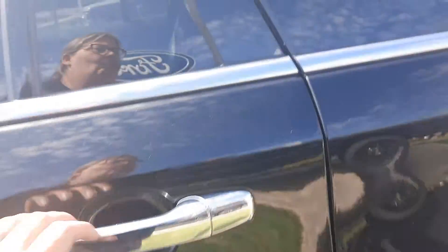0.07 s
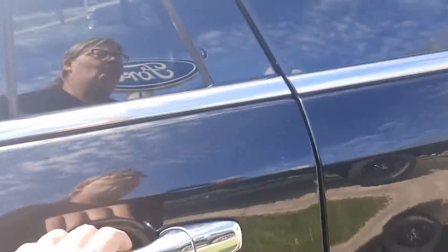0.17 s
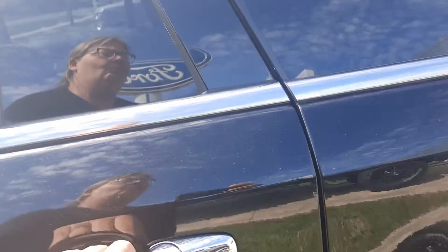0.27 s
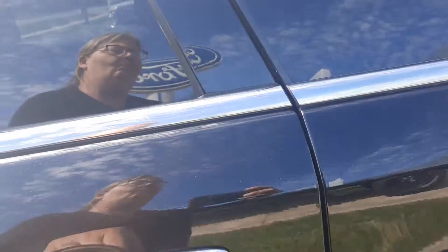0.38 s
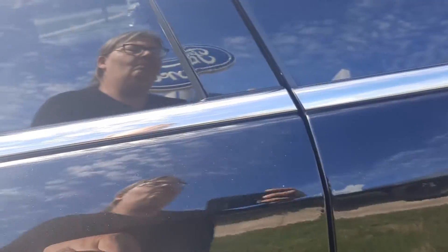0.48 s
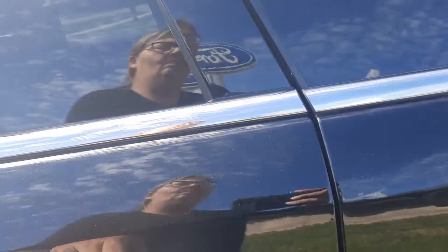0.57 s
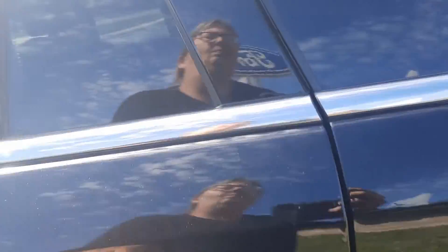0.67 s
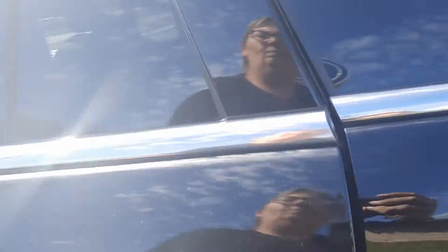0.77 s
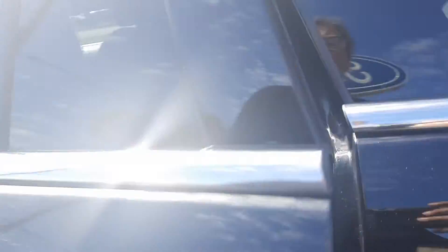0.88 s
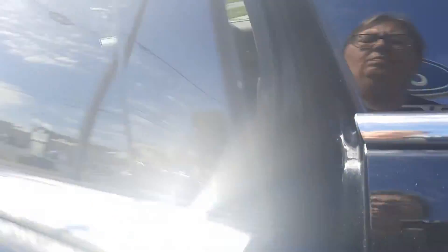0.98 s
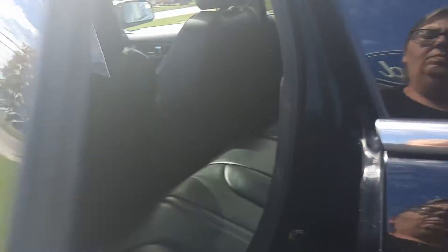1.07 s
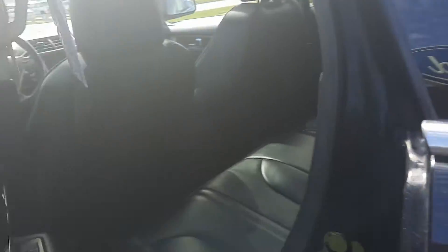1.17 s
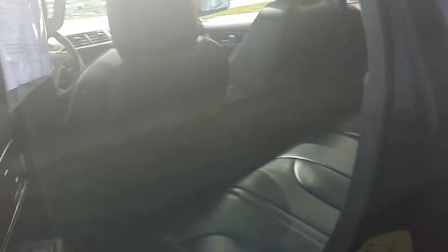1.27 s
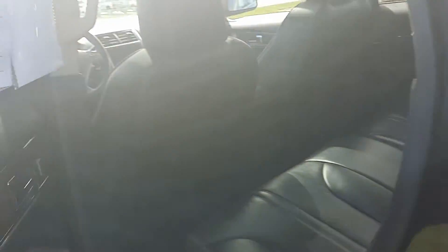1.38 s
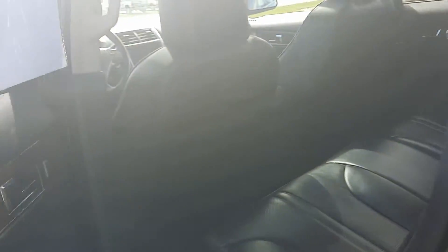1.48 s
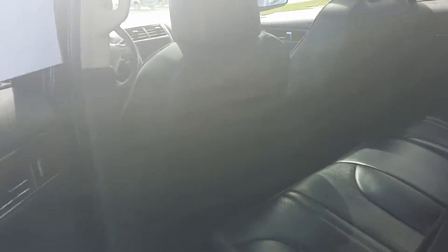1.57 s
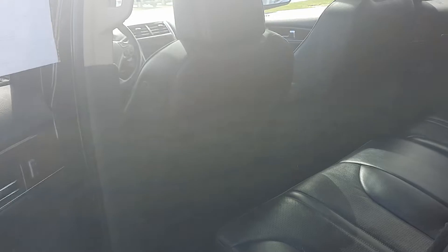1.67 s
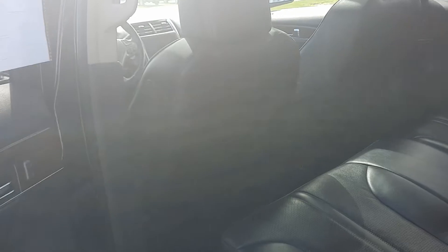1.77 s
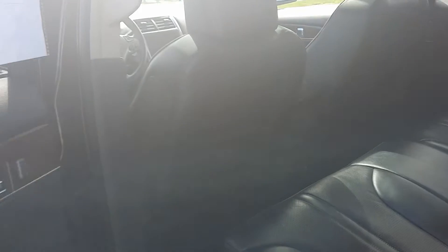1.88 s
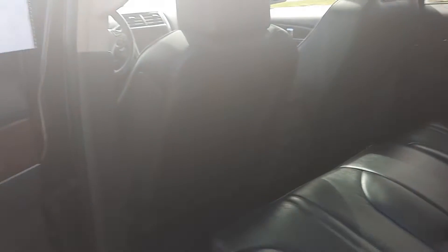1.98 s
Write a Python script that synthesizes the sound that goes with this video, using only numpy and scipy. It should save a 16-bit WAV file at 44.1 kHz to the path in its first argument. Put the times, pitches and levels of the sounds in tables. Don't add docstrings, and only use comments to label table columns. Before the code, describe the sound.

Car door opening outdoors: small handle click, hard latch clunk, wind thumps, then a knocking stop

```python
import sys
import numpy as np
from scipy import signal
from scipy.fft import irfft
from scipy.io import wavfile
from scipy.ndimage import uniform_filter1d

SR = 44100
rng = np.random.default_rng(int(sys.argv[2]) if len(sys.argv) > 2 else 0)


def generate_wav(signal):
    frames = np.transpose(np.atleast_2d(signal))
    scaled = np.clip(frames, -1, 1) * 32767
    pcm = np.round(scaled).astype(np.int16)
    wavfile.write(sys.argv[1], SR, pcm)


def volts_from_db(level):
    exponent = np.asarray(level, float) / 20
    return 10 ** exponent


N = 88200


def read(points, hz):
    f, v = np.transpose(points)
    return np.interp(np.log(hz + 1), np.log(f + 1), v)


def curve(points):
    s, db = np.transpose(points)
    return volts_from_db(np.interp(np.arange(N) / SR, s, db))


def evened(x):
    return x / np.sqrt(np.mean(x ** 2) + 1e-20)


def add(mix, s, sound):
    at = round(s * SR)
    sound = sound[:, max(-at, 0):]
    part = mix[:, max(at, 0):][:, :sound.shape[1]]
    part += sound[:, :part.shape[1]]


def sides(db):
    return volts_from_db(np.array([[db / 2], [-db / 2]]))


def band(x, lo_hz, hi_hz):
    return signal.sosfilt(signal.butter(2, [lo_hz, hi_hz], "band", fs=SR, output="sos"), x)


def late(x, count):
    return np.array([x[0], np.concatenate([x[1, count:0:-1], x[1, :N - count]])])


# frequency in Hz, level in dB.
CRACK_COLOUR = [(300, -6), (900, -2), (2000, -10), (3700, -13), (5000, -12), (7200, -12), (9800, -13),
                (13500, -5.5)]
# frequency in Hz, time to fall 60 dB in seconds.
CRACK_FADE = [(300, 0.45), (900, 0.082), (3000, 0.059), (6000, 0.017), (12000, 0.044)]


def crack():
    noise = rng.standard_normal(8192) + 0.35 * rng.standard_normal((2, 8192))
    hz, t, cells = signal.stft(noise, fs=SR, nperseg=128)
    hz = hz[:, None]
    fading_db = read(CRACK_COLOUR, hz) - 60 * t / read(CRACK_FADE, hz)
    x = band(signal.istft(cells * volts_from_db(fading_db), fs=SR, nperseg=128)[1], 260, 10000)
    fade_in = np.minimum(np.arange(x.shape[1]) / 70, 1)
    return x / np.sqrt(np.mean(x[:, :256] ** 2)) * fade_in


def struck(blows, modes):
    out, t = np.zeros((2, N)), np.arange(12000) / SR
    hz, db, t60 = np.transpose(modes)[:, :, None]
    phase = 0.25 * rng.standard_normal(hz.shape) * np.log2(1 + hz / 500)
    for s, blow_db, crack_db, top_hz in blows:
        mode_db = blow_db + db + rng.standard_normal(hz.shape)
        softness = (1 + (hz / top_hz) ** 2) ** 2
        size = volts_from_db(mode_db - 60 * t / t60) / softness
        size = size * (1 - np.exp(-t * hz / .25))
        ring = [(size * np.sin(2 * np.pi * hz * t + k * phase)).sum(0) for k in (1, -1)]
        add(out, s, np.array(ring) * sides(3))
        add(out, s, volts_from_db(crack_db) * band(crack(), 116, top_hz))
    return out


# frequency in Hz, level in dB, time to fall 60 dB in seconds.
DOOR_SKIN = [(81, -7.5, 0.22), (164, 10.5, 0.03), (252, 5.5, 0.068), (323.4, 7, 0.043), (393.4, -12, 0.21),
             (548, -4, 0.022), (726, -3.5, 0.066), (800, -48, 0.054), (1179, -7, 0.037), (1430, -16, 0.045),
             (1730, -20, 0.067), (970, -14.5, 0.053), (2393, -26, 0.064)]
# start in seconds, level in dB, crack level in dB, hardness as top Hz.
LATCH_BLOWS = [
    (.672, -25.5, -42, 1500),
    (.7121, -12.5, -28, 2580),
    (.718, -11.5, -29, 5050),
    (.7295, -22, -39, 3500),
    (.744, -25, -46, 2500),
    (.763, -26, -55, 1500),
]
# Hz, level in dB, time to fall 60 dB in seconds.
PAWL_TONES = [(3750, -12, .02), (4480, 0, .03), (5150, -5, .018), (5900, -8, .015)]
# start in seconds, level in dB, crack level in dB, hardness as top Hz.
PAWL_TRIPS = [
    (.7128, -32.5, -35.5, 14000),
    (.7146, -29, -33, 11900),
]


def latch():
    return struck(LATCH_BLOWS, DOOR_SKIN) + struck(PAWL_TRIPS, PAWL_TONES)[::-1]


# frequency in Hz, level in dB, time to fall 60 dB in seconds.
HINGE_PILLAR = [(140, -4, 0.2), (237, -3, 0.18), (343, 4.5, 0.14), (475, 8.5, 0.038), (557, 5, 0.022),
                (820, -10, 0.05), (1135, -13, 0.093), (1400, -3, 0.074), (1530, -12, 0.044),
                (1942, -11, 0.099), (2210, -14, 0.04)]
# start in seconds, level in dB, crack level in dB, hardness as top Hz.
STRAP_BLOWS = [
    (1.5992, -27, -32.5, 4500),
    (1.6010, -27.5, -30.5, 2000),
    (1.6028, -24.5, -37.5, 3500),
    (1.6045, -25.5, -25.5, 1960),
    (1.6097, -23.5, -34.5, 3400),
    (1.6187, -19.5, -27, 500),
    (1.6275, -32, -32, 450),
    (1.638, -28, -39, 596),
]
# frequency in Hz, level in dB, time to fall 60 dB in seconds.
ROLLER_TONES = [(1000, -12, .012), (1800, -8, .01), (2300, 0, .012), (2800, -6, .012), (3700, -8, .01),
                (4300, -9, .01)]
# start in seconds, level in dB, crack level in dB, hardness as top Hz.
ROLLER_SNAP = [
    (1.5978, -28, -44, 8000),
]


def check_strap():
    return late(struck(STRAP_BLOWS, HINGE_PILLAR) + struck(ROLLER_SNAP, ROLLER_TONES), count=16)


# frequency in Hz, level in dB, time to fall 60 dB in seconds.
HANDLE_SHELL = [(1000, -6, .015), (300, -16, .02), (520, -9, .012), (780, -9, .012), (1235, -1, .035),
                (1950, -9, .025), (3220, -4, .025), (1420, -9, .012)]
# start in seconds, level in dB, crack level in dB, hardness as top Hz.
HANDLE_PULL = [
    (.2217, -22, -37, 3500),
]
# frequency in Hz, level in dB, time to fall 60 dB in seconds.
GRIP_TONE = [(130, 0, .05)]
# start in seconds, level in dB, crack level in dB, hardness as top Hz.
GRIP_STOP = [
    (.2229, -18, -60, 1500),
]


def handle():
    return late(struck(HANDLE_PULL, HANDLE_SHELL), count=13) + struck(GRIP_STOP, GRIP_TONE)


# start in seconds, level in dB, time to fall 60 dB in seconds, lowest Hz, top Hz.
ECHO_TAILS = [
    (.725, -28.5, 0.16, 180, 800),
    (1.605, -27.5, 0.15, 280, 840),
    (1.604, -40.5, 0.14, 1200, 2100),
    (1.599, -41, 0.093, 1900, 4200),
    (1.364, -42, 0.033, 1500, 2600),
    (.716, -36.5, 0.066, 820, 1600),
]


def tails():
    out, t = np.zeros((2, N)), np.arange(16000) / SR
    for s, db, t60, lo_hz, top_hz in ECHO_TAILS:
        n = rng.standard_normal((3, 16000))
        echoes = evened(band(n[0] + .6 * n[1:], lo_hz, top_hz))
        add(out, s, echoes * volts_from_db(db - 60 * t / t60) * np.minimum(t / 0.0052, 1) * sides(6.7))
    return out


# start in seconds, level in dB, time to fall 60 dB in seconds, lowest Hz, left over right in dB.
PLASTIC_TICKS = [(0.2214, -24.5, 0.01, 6240, 5.5), (0.2295, -63, 0.015, 3000, 8),
                 (.2892, -66, 0.017, 3000, 4), (.77, -75, 0.013, 2000, -9), (.82, -51.5, 0.087, 2000, 0),
                 (1.3688, -45, 0.022, 1200, 0), (1.4411, -34, 0.032, 2500, -2), (1.5545, -45, .02, 5000, 6),
                 (1.532, -51.5, 0.084, 4000, 1), (1.5567, -23, 0.022, 3000, 2),
                 (1.5615, -46, 0.042, 3000, -24), (1.588, -36, 0.077, 2430, 1.5)]
TICK_BANDS = [3350, 5400, 6000, 8360, 11800, 12100]


def ticks():
    out, t = np.zeros((2, N)), np.arange(4000) / SR
    for s, db, t60, lo_hz, lean_db in PLASTIC_TICKS:
        n = rng.standard_normal((3, 4000))
        n = .5 * n[0] + 1.5 * n[1:]
        rings = sum(band(n, 0.96 * hz, 1.04 * hz) for hz in TICK_BANDS)
        x = evened(band(evened(n) + 0.34 * evened(rings), lo_hz, 21000))
        add(out, s, x * volts_from_db(db - 60 * t / t60) * np.minimum(t / 0.00036, 1) * sides(lean_db))
    return late(out, count=10)


# centre in seconds, length in seconds, peak in dB, pitch in Hz, left over right in dB.
EDDIES = [(1.202, 0.0032, -10.5, 122, 26), (1.227, 0.016, -21, 105, 38), (1.287, 0.0044, -13.5, 102, 9),
          (1.31, 0.014, -10.5, 79, 34), (1.326, 0.0035, -13, 131, -4), (1.336, 0.012, -13, 157.6, 32),
          (1.351, 0.013, -19, 148, 28), (1.371, 0.0026, -10.5, 130, 15), (1.401, 0.0033, -14.5, 294, 24),
          (1.405, 0.0062, -7.5, 90, 24), (1.424, 0.0062, -20.5, 89.5, 32), (1.498, 0.0089, -21.5, 140, 33),
          (1.582, 0.0038, -17, 200, 13), (1.639, 0.021, -15.5, 96.3, 8), (1.687, 0.033, -23, 94, 0.5),
          (1.702, 0.0053, -14.5, 101, 29), (1.733, 0.0079, -17.5, 107, 24), (1.747, 0.0047, -16.5, 117, 3),
          (1.767, 0.0084, -23, 103, 5.5), (1.813, 0.015, -18, 76.6, 24)]


def gusts():
    out, t = np.zeros((2, N)), np.arange(-3000, 3000) / SR
    for s, length, db, hz, lean_db in EDDIES:
        edge = evened(band(band(rng.standard_normal((2, 6000)), hz, 3 * hz), hz, 4 * hz))
        swing = np.sin(2 * np.pi * hz * t) + 0.14 * edge
        ports = volts_from_db(np.minimum([[lean_db], [-lean_db]], 0))
        add(out, s + t[0], volts_from_db(db) * swing * np.exp(-(t / length) ** 2) * ports)
    return out


# start in seconds, length in seconds, level in dB, lowest Hz, top Hz.
AIR_RUSH = [
    (1.192, 0.042, -41, 153, 395),
    (1.28, 0.13, -30.5, 168, 345),
]


def rush():
    out = np.zeros((2, N))
    for s, length, db, lo_hz, top_hz in AIR_RUSH:
        n = rng.standard_normal((2, SR))[:, :round(length * SR)]
        rumble = evened(band(band(n, lo_hz, top_hz), lo_hz, top_hz))
        add(out, s, volts_from_db(db) * rumble * np.hanning(n.shape[1]) ** .5 * sides(5.5))
    return out


# start in seconds, length in seconds, level in dB, centre in Hz, width in Hz.
SEAL_RUBS = [
    (0, 0.21, -53.5, 1050, 900),
    (1.053, 0.18, -66, 14900, 1200),
    (0.526, 0.048, -53.5, 6300, 4000),
    (0.529, 0.047, -55, 12800, 4000),
    (1.001, 0.43, -64, 6330, 700),
    (1.739, 0.64, -52.5, 13240, 2400),
    (1.749, 0.85, -62.5, 7460, 3500),
]


def rubs():
    out = np.zeros((2, N))
    for s, length, db, hz, width in SEAL_RUBS:
        n = rng.standard_normal((2, SR))[:, :round(length * SR)]
        hiss = evened(band(n, hz - width / 2, hz + width / 2))
        add(out, s, volts_from_db(db) * hiss * np.hanning(n.shape[1]) ** 0.16)
    return out


# frequency in Hz, width in Hz, level in dB, waver from 0 to 1.
HUM_TONES = [(78, 5, -36, .6), (298, 12, -46, .7), (150, 15, -46, .8), (199, 2, -35.5, .2)]
# time in seconds, level in dB.
HUM_STRENGTH = [(0, -0.5), (.4, 2.5), (.7, 2.5), (1.0, -0.5), (1.2, -1), (2, -2)]
# time in seconds, level in dB.
DRONE_STRENGTH = [(0, -28), (.25, -4), (.45, 1), (.75, -1.5), (.95, 1.5), (1.15, 3), (1.5, 2), (1.9, 2),
                  (2, -0.5)]


def hum():
    t, out = np.arange(N) / SR, 0
    for hz, width, db, waver in HUM_TONES:
        r = np.exp(-np.pi * width / SR)
        drift = evened(signal.lfilter([1], [1, -r], rng.standard_normal((2, 2 * N)))[:, N:])
        wavering = 1 + waver * (drift[0] + 1j * drift[1])
        tone = (wavering * np.exp(2j * np.pi * hz * t)).real
        strength = curve(DRONE_STRENGTH) if hz < 100 else 1
        out = out + volts_from_db(db) * strength * tone
    return out * curve(HUM_STRENGTH) * sides(1.0)


# frequency in Hz, likeness from 0 to 1.
LIKENESS = [(60, 0.91), (330, 1), (600, 0.12), (2000, 0.59), (4500, 0)]


def wash(spectrum, patchy_db):
    frames, hz = N // 512 + 5, np.fft.rfftfreq(2048, 1 / SR)
    a, b, c, d, p = rng.standard_normal((frames, 1025, 5)).T
    patches = evened(uniform_filter1d(uniform_filter1d(p, size=20, axis=0), size=6, axis=1))
    same = np.clip(read(LIKENESS, hz), 0, 1)[:, None]
    left = a + 1j * b
    right = same * left + np.sqrt(1 - same ** 2) * (c + 1j * d)
    z = np.array([left, right]) * volts_from_db(read(spectrum, hz)[:, None] + patchy_db * patches)
    return evened(signal.istft(z, nperseg=2048, noverlap=1536)[1][:, :N])


# frequency in Hz, level in dB per Hz.
TRAFFIC_COLOUR = [(30, -14.5), (70, -3.5), (170, -8.5), (330, -14.5), (600, -22), (1500, -30),
                  (4000, -48.5), (16000, -62.5)]
# time in seconds, level in dB.
DOOR_SCREEN = [(0, 3.5), (.3, 3), (.65, 5.5), (.8, 3), (1.1, 1), (1.5, 1), (1.75, -1), (2, 2)]
# frequency in Hz, level in dB per Hz.
HISS_COLOUR = [(3000, 3.5), (6000, -5.5), (9000, -4.5), (11500, 3), (13500, 3), (16000, -3.5)]
# time in seconds, level in dB.
HISS_STRENGTH = [(0, 2.5), (.3, 4), (.6, 0.5), (.8, -4), (1.0, -2.5), (1.3, 4), (1.5, 1.5), (1.7, -1.5),
                 (2, -2.5)]


def air():
    traffic = volts_from_db(-37) * curve(DOOR_SCREEN) * wash(TRAFFIC_COLOUR, patchy_db=-1.7)
    hiss = volts_from_db(-57.5) * curve(HISS_STRENGTH) * wash(HISS_COLOUR, patchy_db=-3.4)
    return traffic + hiss


def scene():
    door = latch() + check_strap() + handle() + tails() + ticks()
    moving_air = gusts() + rush()
    street = late(air() + hum(), count=17)
    return door + moving_air + rubs() + street


def band_limit(x):
    return signal.sosfilt(signal.butter(12, 16500, fs=SR, output="sos"), x)


# frequency in Hz, level in dB.
RIGHT_COLOUR = [(100, -1), (800, -3.5), (2000, 1), (5000, 3.5), (8300, 2.5), (9600, -10), (11000, -15),
                (13500, -1)]


def record(dry):
    hz = np.fft.rfftfreq(512, 1 / SR)
    port = np.fft.fftshift(irfft(volts_from_db(read(RIGHT_COLOUR, hz)))) * np.hanning(513)[:512]
    x = np.pad(dry, ((0, 0), (512, 512)), "reflect", reflect_type="odd")
    right = signal.oaconvolve(x[1], port)[256:256 + x.shape[1]]
    x = np.array([x[0], right])
    x = signal.sosfilt(signal.butter(2, 55, "high", fs=SR, output="sos"), x)
    x = signal.oaconvolve(x, signal.firwin(255, 15900, fs=SR)[None], "same")[:, 512:-512]
    return band_limit(x)


dry = scene()
out = record(dry)
generate_wav(out)
```